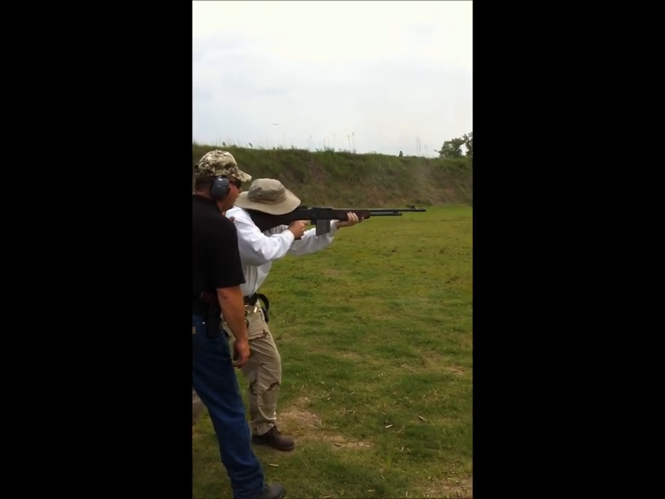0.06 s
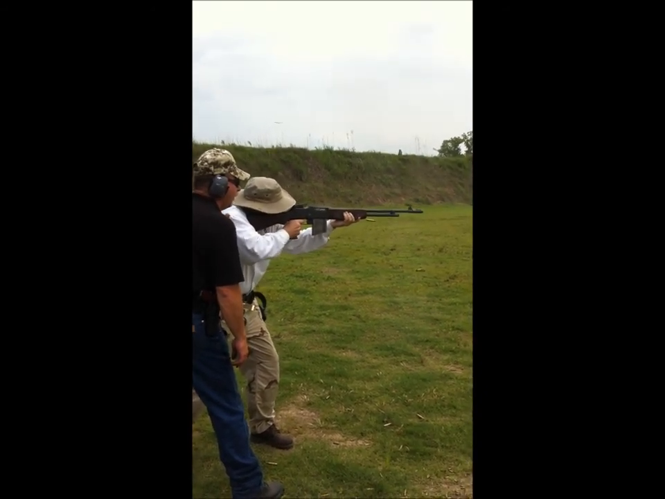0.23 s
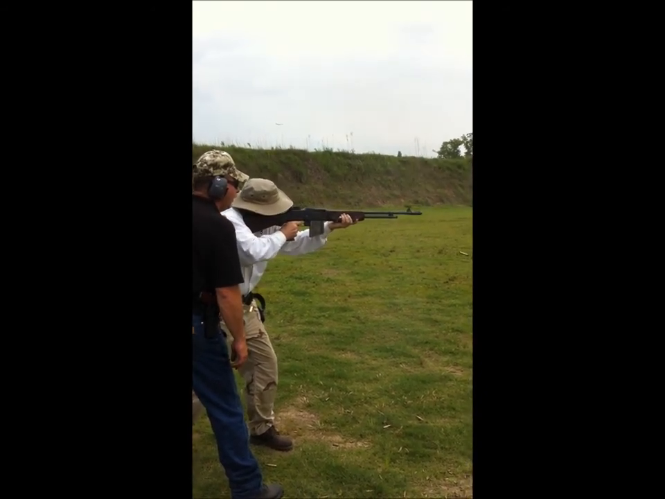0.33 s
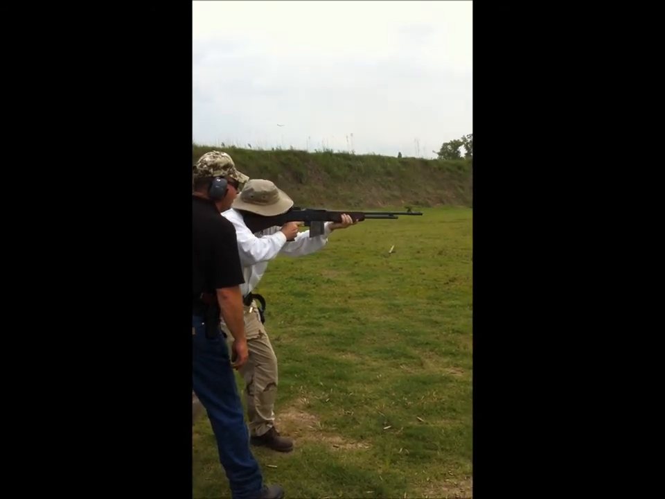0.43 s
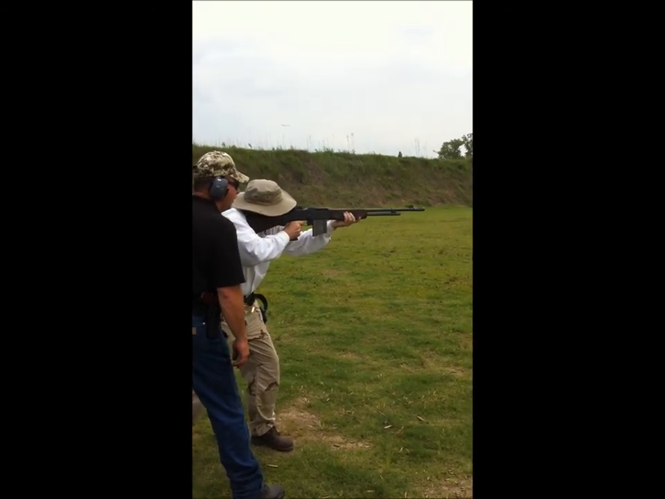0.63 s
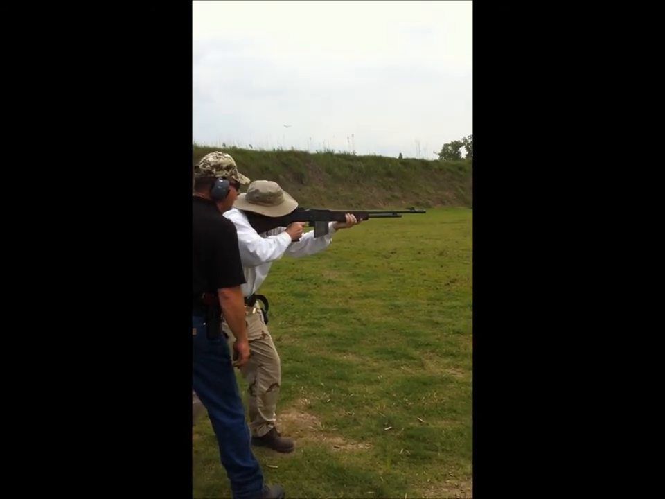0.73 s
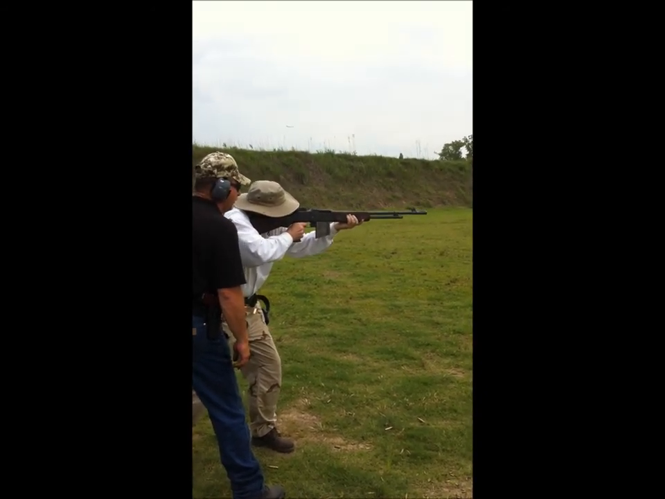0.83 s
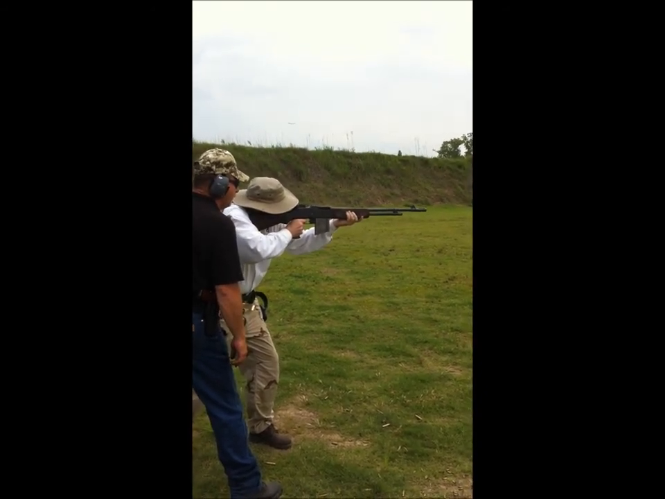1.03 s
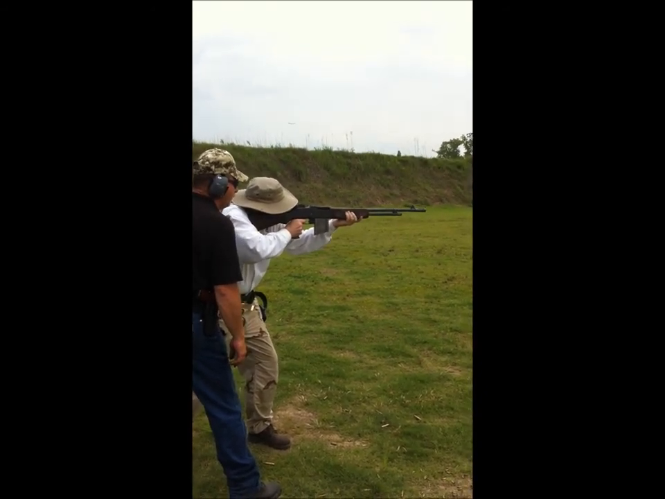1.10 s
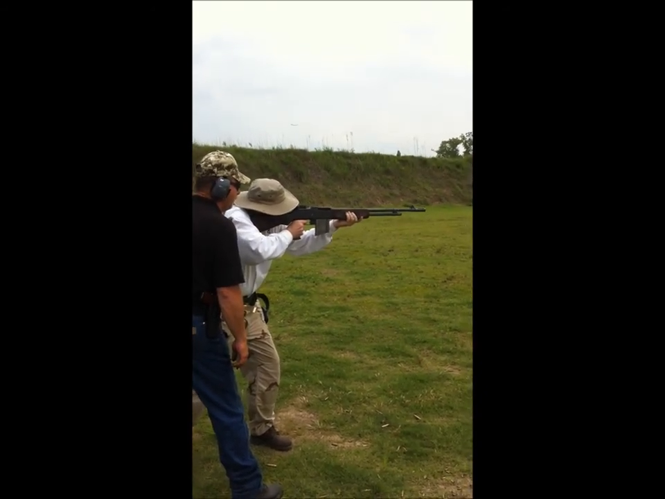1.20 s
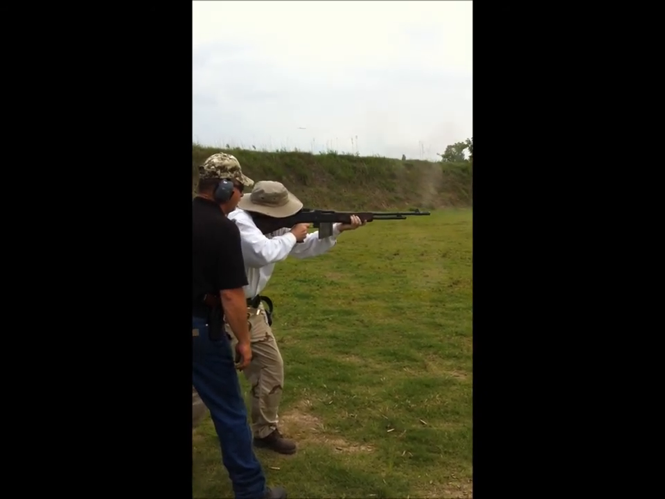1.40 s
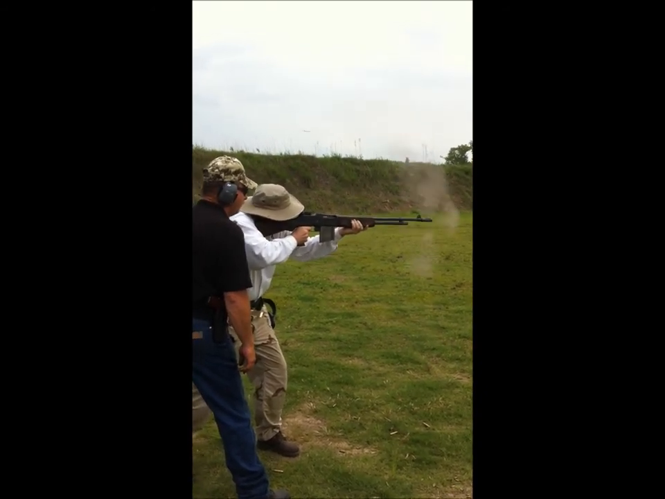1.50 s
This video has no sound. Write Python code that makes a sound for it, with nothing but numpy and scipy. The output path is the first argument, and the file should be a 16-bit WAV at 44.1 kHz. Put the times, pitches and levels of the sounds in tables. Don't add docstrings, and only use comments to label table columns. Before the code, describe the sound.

Short burst of automatic rifle fire outdoors, three hard cracks, rumbling tail, then quiet windy air

```python
import sys
import numpy as np
from scipy import signal
from scipy.io import wavfile
from scipy.ndimage import uniform_filter1d

SR = 44100
rng = np.random.default_rng(int(sys.argv[2]) if len(sys.argv) > 2 else 0)


def makeup_ratio(level_db):
    decades = np.asarray(level_db, float) / 20
    return 10 ** decades


def materialize(psi):
    bounded = np.clip(np.atleast_2d(psi).T, -1, 1)
    quanta = np.round(bounded * 32767).astype(np.int16)
    wavfile.write(sys.argv[1], SR, quanta)


N = 68355

# frequency in Hz, level in dB.
AIR_COLOUR = [(40, -26), (90, -28), (200, -1), (350, -12), (700, -6.5), (1500, -16), (8000, -28),
              (15500, -44)]
# time in seconds, level in dB.
WIND_LEVEL = [
    (0, -63.5),
    (.3, -57),
    (1.2, -69),
    (1.3, -60),
    (1.55, -54),
]
# time in seconds, level in dB, brightness in dB.
FIELD_LEVEL = [
    (0.223, -29.5, 12),
    (0.302, -21, -1.5),
    (0.391, -20.5, 5),
    (0.548, -19.5, -8),
    (0.599, -22.5, 0.5),
    (0.739, -27.5, 0),
    (0.802, -41.5, -0.5),
    (1.0, -49, -2.5),
    (1.2, -52.5, -1),
]
# frequency in Hz, level in dB.
FIELD_COLOUR = [(60, -7), (110, -3), (200, 4), (400, -1.5), (1000, -11.5), (2500, -4.5), (9000, -16.5),
                (15500, -18)]
# start in seconds, peak in dB, pitch in Hz, T60 in seconds.
THUDS = [
    (.632, -3, 183, 0.027),
    (.714, -13.5, 234, 0.067),
    (.738, -16, 640, 0.033),
    (.752, -30, 246, .12),
    (.886, -18.5, 238, 0.023),
    (.925, -37, 218, 0.069),
    (1.241, -46, 250, 0.027),
]
# start in seconds, peak in dB, pitch in Hz, T60 in seconds.
FAR_SHOTS = [
    (1.328, -30, 140, .07),
    (1.440, -31, 150, .07),
]
# frequency in Hz, level in dB, T60 in seconds.
CASE_MODES = [
    (9593, 0, .045),
    (9560, -12, .9),
    (14140, -27, .02),
]
# start in seconds, level in dB.
CASE_HITS = [
    (1.245, -65),
    (1.481, -15.5),
    (1.505, -30),
]
# start in seconds, peak in dB, centre in Hz, T60 in seconds.
CLATTER = [(0.032, -30, 6960, 0.051), (.161, -15.5, 5870, 0.27), (0.168, -15.5, 5700, 0.061),
           (.180, -15.5, 3240, 0.056), (0.192, -18, 680, 0.16), (0.2077, -2, 4860, 0.021),
           (0.215, -9.5, 5760, 0.21), (0.2237, -4, 8900, 0.24), (0.2278, -4, 8900, .12),
           (.3445, 15.5, 7100, 0.014), (0.4521, 4.5, 6700, 0.09), (0.518, -0.5, 8200, 0.041),
           (0.578, -12, 3300, 0.016), (0.109, -39, 4630, 0.17), (0.686, -15, 2840, 0.18),
           (.9, -38.5, 2500, 0.11), (1.001, -35.5, 3470, 0.25), (1.0525, -37, 8000, 0.042),
           (1.137, -40.5, 2780, 0.084), (1.264, -37, 7940, 0.14), (1.327, -34, 2800, 0.14),
           (1.408, -37.5, 7000, 0.085), (1.535, -23.5, 695, 0.24), (1.4826, -22, 6060, 0.045),
           (1.506, -26, 5970, 0.1), (1.5173, -17, 5700, 0.26), (1.5339, -11, 6860, 0.097),
           (1.5434, -16.5, 6950, 0.14)]
# start in seconds, peak in dB,
# centre in Hz, T60 in seconds.
CRACKS = [
    (.1995, -18, 11000, .018),
    (.6178, -11, 6000, .022),
    (.6252, -14, 4500, .03),
    (.6535, -18, 2200, .05),
    (.668, -19, 2200, .06),
    (.727, -22, 720, .16),
    (1.1295, -40, 720, .25),
    (1.4372, -46, 2500, .04),
    (.172, -36, 800, .3),
]
# start in seconds, level in dB.
SHOTS = [
    (.2372, 0),
    (.3467, 0),
    (.4528, 0),
]
# delay in seconds, level in dB, sign, positive phase in seconds, top in Hz.
DIRECT = [
    (-.0002, 3, 1, .0001, 12000),
    (0, 3, -1, .0011, 7000),
    (.0031, -3, 1, .0001, 12000),
    (.0033, -9, -1, .002, 7000),
]
# delay in seconds, level in dB, sign, positive phase in seconds, top in Hz.
ARRIVALS = [
    (.0148, 6, 1, 0.0014, 1940),
    (.0339, 10, -1, .0003, 3000),
    (.0344, -11, 1, .0009, 2480),
    (.0373, -10, 1, 0.0014, 2480),
    (.0387, -2, 1, .0008, 2500),
    (.0422, -4, 1, .0008, 2000),
    (.0455, -7.5, 1, .0008, 2000),
]
# delay in seconds, rise in seconds, T60 in seconds, level in dB, centre in Hz.
SCATTER = [
    (.019, 0.0099, 0.093, -12.5, 900),
    (0.0282, 0.0021, .05, -12, 1700),
    (.036, .004, .1, -20.5, 900),
    (.064, 0.013, 0.14, -18, 800),
    (.018, 0.0067, 0.27, -20.5, 9000),
    (0.063, 0.013, 0.6, -24.5, 8900),
]
# start in seconds, level in dB, positive phase in seconds.
SLAPS = [
    (.2358, -2, .0005),
    (.2437, -7, .0001),
    (.2444, -4, .0001),
    (.3559, -2, .0004),
    (.4621, -11, .0003),
    (.5804, -8, .0002),
    (.6187, -5, .0002),
    (.626, -8, .0002),
    (1.1297, -28, .0004),
    (1.4378, -33, .0003),
]


def rms_one(x):
    return x / np.sqrt(np.mean(x ** 2) + 1e-20)


def drift(rate_hz):
    r = np.exp(-2 * np.pi * rate_hz / SR)
    settle = 9000
    slow = signal.lfilter([1], [1, -2 * r, r * r], rng.standard_normal(N + settle))
    return rms_one(slow[settle:])


def add(out, s, x):
    i = int(s * SR)
    out[i:i + len(x)] += x[:N - i]


def coloured(points, patchy_db, tilt_db=0):
    out = 0
    edges = 40 * 2 ** np.arange(0, 9.1, .5)
    white = rng.standard_normal((2, N))
    hz_at, db_at = np.transpose(points)
    for k, (low, high) in enumerate(zip(edges, np.minimum(edges[1:], 19000))):
        hz = np.sqrt(low * high)
        band = signal.sosfilt(signal.butter(2, [low, high], "band", fs=SR, output="sos"), white[k % 2])
        power = uniform_filter1d(band ** 2, size=1500) + 1e-12
        band = band * (np.std(band) ** 2 / power) ** .3
        level_db = np.interp(np.log(hz), np.log(hz_at), db_at) + patchy_db * drift(32)
        bright_db = tilt_db * np.log2(hz / 1500) / 2
        out = out + band * makeup_ratio(level_db) * makeup_ratio(bright_db)
    return out


def burst(rise_s, t60, hz, octaves):
    t = np.arange(12000) / SR
    band = [hz / 2 ** octaves, min(hz * 2 ** octaves, 19000)]
    grain = makeup_ratio(3.0 * drift(510)[:len(t)])
    noise = rng.standard_normal(len(t)) * grain
    noise = rms_one(signal.lfilter(*signal.butter(2, band, "band", fs=SR), noise))
    rise = np.minimum(t / max(rise_s, 1e-4), 1)
    decay = makeup_ratio(-60 * np.maximum(t - rise_s, 0) / max(t60, .004))
    return noise * rise * decay


def air():
    lumps = rms_one(signal.lfilter(*signal.butter(2, 110, fs=SR), rng.standard_normal(N)))
    gust_db = np.interp(np.arange(N) / SR, *np.transpose(WIND_LEVEL)) + 3 * drift(12)
    floor = makeup_ratio(-50.5) * rms_one(coloured(AIR_COLOUR, 0.4))
    return floor + makeup_ratio(gust_db + 8.5) * lumps


def echo_field():
    t = np.arange(N) / SR
    s, db, bright_db = np.transpose(FIELD_LEVEL)
    tail_db = -60 * np.maximum(t - s[-1], 0)
    level_db = np.interp(t, s, db) + tail_db + 1.67 * drift(54)
    noise = coloured(FIELD_COLOUR, 1.3, np.interp(t, s, bright_db))
    noise = noise / np.std(coloured(FIELD_COLOUR, 0))
    fade_in = np.clip((t - s[0]) / 0.007, 0, 1)
    return makeup_ratio(level_db) * noise * fade_in


def far_thuds():
    out, t = np.zeros(N), np.arange(8000) / SR
    for s, db, hz, t60 in THUDS + FAR_SHOTS:
        push = np.sin(2 * np.pi * hz * t) * np.minimum(t / 0.0051, 1) * makeup_ratio(-60 * t / t60)
        breath = burst(0.0031, t60, hz, 0.52)[:len(t)]
        add(out, s, makeup_ratio(db) * (push + 0.21 * breath))
    return out


def brass_cases():
    out, t = np.zeros(N), np.arange(8000) / SR
    for s, db in CASE_HITS:
        for hz, level_db, t60 in CASE_MODES:
            add(out, s, makeup_ratio(db + level_db - 60 * t / t60) * np.sin(2 * np.pi * hz * t))
    return out


def clatter():
    out = np.zeros(N)
    for s, db, hz, t60 in CLATTER:
        add(out, s, makeup_ratio(db - 12.5) * burst(0.014 * t60, t60, hz, 2.05))
    for s, db, hz, t60 in CRACKS:
        octaves = .45 if hz < 1000 else .9
        add(out, s, makeup_ratio(db) * burst(.0004, t60, hz, octaves))
    return out


def hush():
    t = np.arange(N) / SR
    start_s, length_s = .0025, .0155
    duck_db = 0
    for s, _ in SHOTS:
        sink = (t - s - start_s) / .002
        recover = (s + start_s + length_s - t) / .006
        duck_db = duck_db - 20 * np.clip(np.minimum(sink, recover), 0, 1)
    return makeup_ratio(duck_db)


def blast(phase_s, top_hz):
    t = np.arange(2000) / SR / max(phase_s, 3e-5)
    return signal.lfilter(*signal.butter(2, min(top_hz, 19000), fs=SR), (1 - t) * np.exp(-t))


def rifle():
    out, one_round = np.zeros(N), np.zeros(SR // 2)
    lead = .001
    for delay, level_db, sign, phase_s, top_hz in DIRECT + ARRIVALS:
        add(one_round, lead + delay, sign * makeup_ratio(level_db) * blast(phase_s, top_hz))
    for delay, rise_s, t60, level_db, hz in SCATTER:
        add(one_round, lead + delay, makeup_ratio(level_db) * burst(rise_s, t60, hz, 0.65))
    for s, db in SHOTS:
        add(out, s - lead, makeup_ratio(db) * one_round)
    for s, db, phase_s in SLAPS:
        add(out, s, makeup_ratio(db) * blast(phase_s, 6400))
    return out


def scene():
    ducked = echo_field() + far_thuds() + brass_cases() + clatter()
    mono = air() + hush() * ducked + rifle()
    return np.array([mono, mono])


def top_cut(x):
    return signal.sosfilt(signal.butter(12, 15850, fs=SR, output="sos"), x)


def record(dry):
    bass_hz, bass_q, ceiling = 169, 1.103, 1.08
    w = 2 * np.pi * bass_hz / SR
    a, c = np.sin(w) / 2 / bass_q, np.cos(w)
    x = signal.lfilter(np.array([1, -2, 1]) * (1 + c) / 2, [1 + a, -2 * c, 1 - a], dry)
    x = ceiling * np.tanh(x / ceiling)
    x = signal.lfilter(*signal.butter(2, 13800, fs=SR), x)
    x = signal.sosfilt(signal.cheby2(20, 60, 15900, fs=SR, output="sos"), x)
    return top_cut(x)


dry = scene()
out = record(dry)
materialize(out)
```